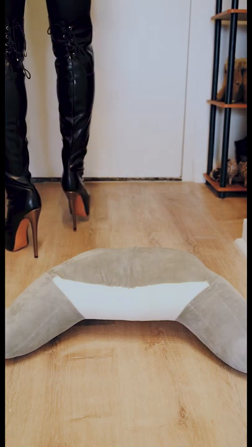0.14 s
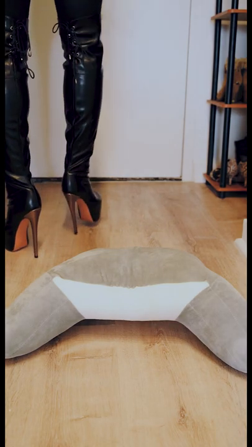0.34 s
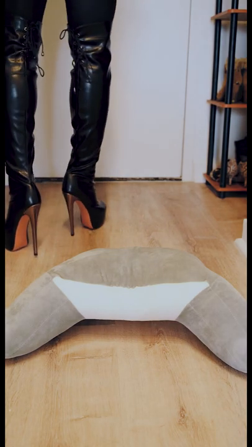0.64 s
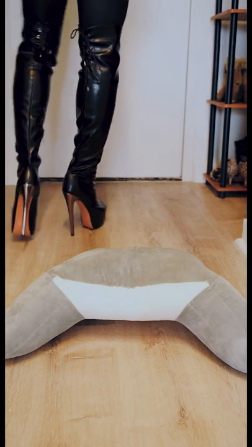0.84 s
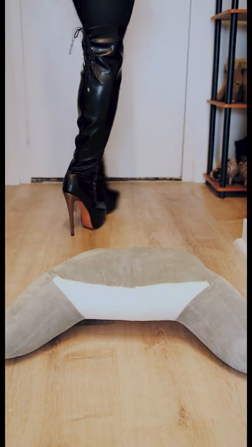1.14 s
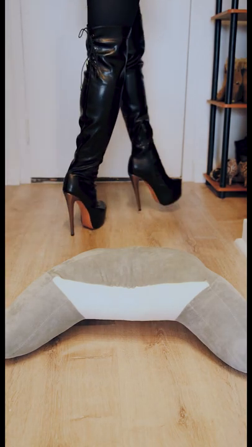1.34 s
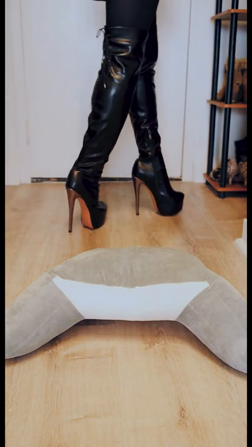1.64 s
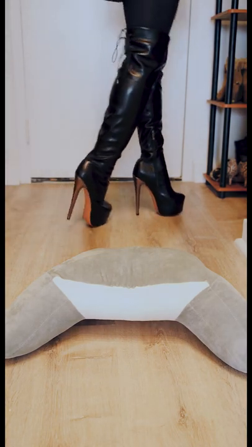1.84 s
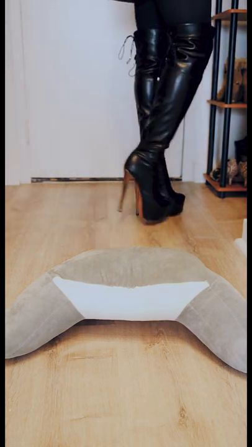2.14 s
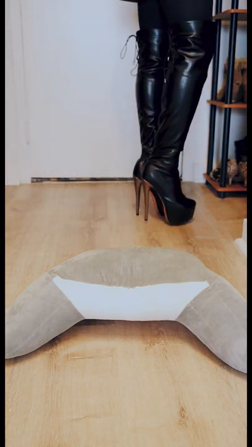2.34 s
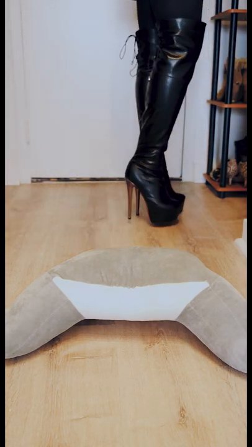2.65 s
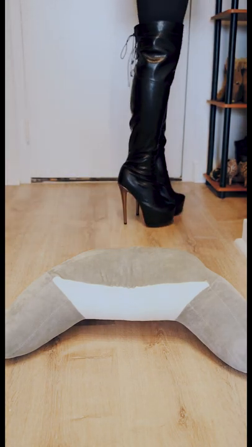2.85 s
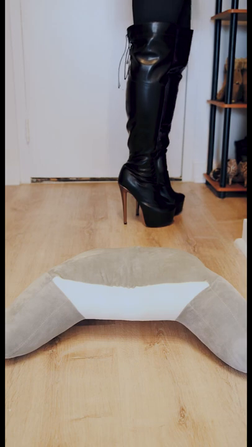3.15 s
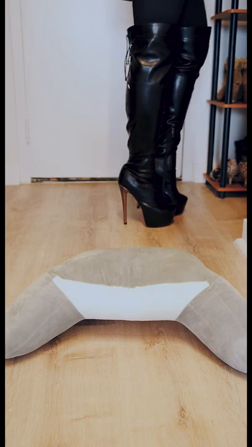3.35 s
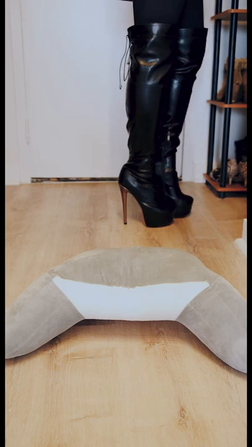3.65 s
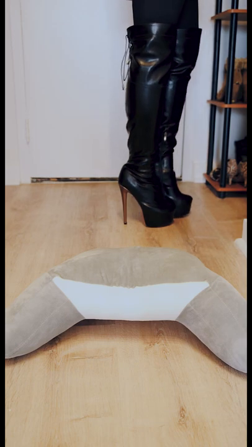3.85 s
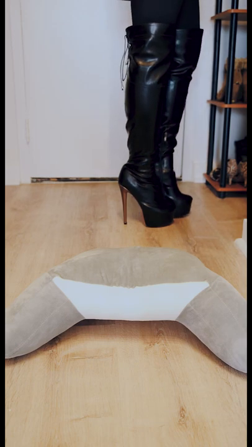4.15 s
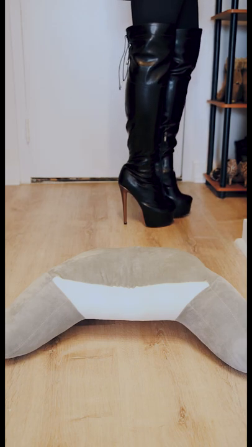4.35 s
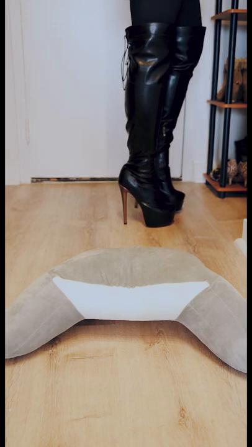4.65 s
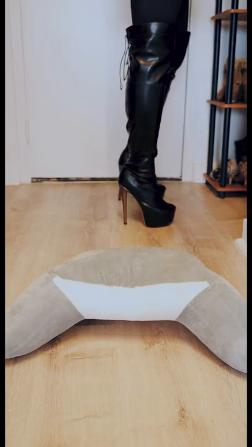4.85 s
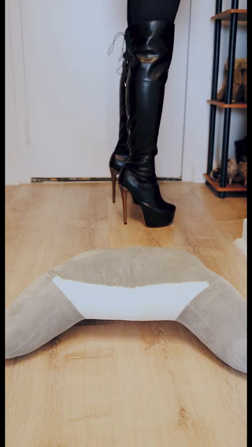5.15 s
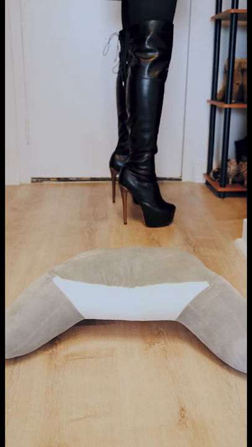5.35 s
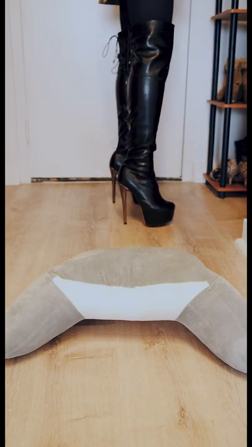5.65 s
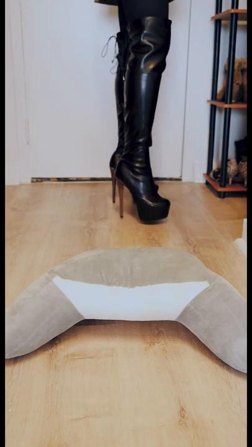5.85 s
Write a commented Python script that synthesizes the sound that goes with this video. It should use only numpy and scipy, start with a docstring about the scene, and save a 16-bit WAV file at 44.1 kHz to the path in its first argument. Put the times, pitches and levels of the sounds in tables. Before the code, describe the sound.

Stiletto boots take slow, uneven steps on a wooden floor in a small room, heard from nearby. Heel clicks and sole knocks mix with light taps and short gritty creaks as the soles twist. One heavier step near the middle makes the floor boom. The leather shafts rustle faintly and creak at the end. A low rumble and hum lie underneath, joined later by a faint, distant engine drone.

```python
"""Stiletto boots take slow, uneven steps on a wooden floor in a small room. Each impact of heel tip or platform
sole excites the modes of the boards; heavy ones make the floor boom. Soles and leather creak by stick-slip
friction as the weight shifts, shafts rustle and lace tips jingle. Underneath lie a low rumble, a faint hiss and
the steady hum of a far-off engine, which later speeds up through two gears."""
import sys
import numpy as np
from scipy import signal
from scipy.fft import rfft, irfft
from scipy.io import wavfile

SR = 44100
rng = np.random.default_rng(int(sys.argv[2]) if len(sys.argv) > 2 else 0)


def output_pcm(signal):
    """Save a mono or channel-first signal as 16-bit PCM at the path in sys.argv[1].

    Samples are clipped to [-1, 1] before scaling.
    """
    pcm = np.clip(np.atleast_2d(signal).T, -1, 1) * 32767
    wavfile.write(sys.argv[1], SR, np.round(pcm).astype(np.int16))


N = 264159
TIME = np.arange(N) / SR


def amp(db):
    """Amplitude ratio of a level in decibels."""
    return 10 ** (np.asarray(db) / 20)


def unit(x):
    """Normalisation to an rms of 1."""
    return x / np.sqrt(np.mean(x ** 2) + 1e-20)


def read(points, hz):
    """Interpolation of (Hz, value) rows on a logarithmic frequency axis."""
    f, value = np.transpose(points)
    return np.interp(np.log(hz + 1), np.log(f + 1), value)


def add(mix, s, sound):
    """Superposition of a sound on the mix, starting at s seconds."""
    part = mix[max(round(s * SR), 0):][:len(sound)]
    part += sound[:len(part)]


def noise(spectrum):
    """Spectral shaping of white noise, at rms 1."""
    gain = amp(read(spectrum, np.fft.rfftfreq(N, 1 / SR)))
    return unit(irfft(rfft(rng.standard_normal(N)) * gain, N))


def drift(rate_hz):
    """Slow random modulation: low-passed noise of rms 1."""
    hz = np.fft.rfftfreq(N, 1 / SR)
    return unit(irfft(rfft(rng.standard_normal(N)) * np.exp(-(hz / rate_hz) ** 2) * (hz > 0), N))


def pulse(*spectra, size=4096):
    """Minimum phase: the sharpest causal click that has the summed dB spectra."""
    hz = abs(np.fft.fftfreq(size, 1 / SR))
    log_gain = np.log(amp(sum(read(s, hz) for s in spectra)))
    return np.fft.ifft(np.exp(np.conj(signal.hilbert(log_gain)))).real[:size // 2]


def push(seconds):
    """Soft contact: a unit impulse spread over a rounded pulse."""
    shape = signal.windows.hann(round(seconds * SR))
    return shape / shape.sum()


def ring(hz, t60, t):
    """Free vibration of a damped mode, falling 60 dB in t60 seconds."""
    return np.sin(2 * np.pi * hz * t) * np.exp(-np.log(1000) * t / t60)


def tail(decays, rise_s, size=256):
    """Frequency-dependent damping: a noise burst of energy 1 that dies by (Hz, T60) rows."""
    t = np.arange(SR // 2) / SR
    hz, frame_s, bands = signal.stft(rng.choice([-1., 1.], len(t)), SR, nperseg=size)
    bands = np.exp(1j * np.angle(bands)) * amp(-60 * frame_s / read(decays, hz)[:, None])
    out = signal.istft(bands, SR, nperseg=size)[1][:len(t)] * (1 - np.exp(-t / rise_s))
    return out / np.linalg.norm(out)


# Spectra of the room's still air. Each row: frequency in Hz, relative density in dB.
RUMBLE_SPECTRUM = [(10, -6), (28, 1), (42, -5), (55, 1), (75, -8), (100, -6.5), (130, -6.5), (165, -8.5),
                   (205, -6), (250, -21.5), (300, -19.5), (370, -20.5), (450, -25.5), (700, -40),
                   (1500, -69), (4000, -93)]
HISS_SPECTRUM = [(150, -21), (500, 3), (1000, -0.5), (1500, -5.5), (2400, -11.5), (3500, -12),
                 (4800, -17.5), (8000, -19.5), (12000, -22), (16000, -24)]

def room_air():
    """Ambient noise: a low rumble swells and ebbs at random under a steady hiss."""
    rumble = noise(RUMBLE_SPECTRUM) * amp(-40 + 1.3 * drift(rate_hz=1.9))
    return rumble + amp(-61.5) * noise(HISS_SPECTRUM)


# Slow envelope of the hum. Each row: time in seconds, level in dB.
HUM_LEVELS = [(0,-40.5), (2.3,-44.5), (3.9,-41.5), (4.7,-55.5), (5.2,-47), (5.99,-49.5)]

def hum(pitch_hz=166.6, waver_hz=2.24, swell_db=3):
    """Frequency and amplitude modulation: one low tone wavers at random."""
    cycles = np.cumsum(pitch_hz + waver_hz * drift(rate_hz=8.7)) / SR
    tone = np.sin(2 * np.pi * cycles) * amp(swell_db * drift(rate_hz=4))
    return unit(tone) * amp(np.interp(TIME, *np.transpose(HUM_LEVELS)))


# Spectrum of the rustle. Each row: frequency in Hz, relative density in dB.
RUSTLE_SPECTRUM = [(200, -36), (600, 0), (1200, -4), (2200, -6.5), (3600, -6.5), (4600, -14), (8000, -17),
                   (12000, -27), (16000, -36)]
# Leg movements. Each row: middle in seconds, length in seconds, peak level in dB.
LEG_MOVES = [(.08,0.45,-58), (.52,0.46,-58), (1.04,0.56,-57.5), (2.02,0.49,-58.5), (2.9,1.9,-66.5),
             (4.98,0.34,-62), (5.65,0.59,-60.5)]

def shaft_rustle(edge_db=-6.5):
    """Friction noise: the boot shafts brush as the legs move, and overlapping moves add in power."""
    power = sum(amp(db + edge_db * (2 * (TIME - s) / length) ** 2) ** 2 for s, length, db in LEG_MOVES)
    return noise(RUSTLE_SPECTRUM) * np.sqrt(power)


# Early reflections. Each row: delay in seconds, relative gain.
REFLECTIONS = [(.0022, 0.67), (.0047, -0.29), (0.0087, 0.091), (0.0123, 0.48), (0.0161, -0.25)]
# Reverberation. Each row: frequency in Hz, T60 in seconds.
ROOM_DECAY = [(150, 0.21), (400, 0.34), (1000, 0.32), (2800, 0.3), (7000, 0.33), (14000, 0.065)]

def room(echo_db, wet_db):
    """Impulse response from one spot on the floor: direct sound, early reflections, diffuse tail."""
    path = amp(wet_db) * tail(ROOM_DECAY, rise_s=0.0016)
    path[0] += 1
    for delay, gain in REFLECTIONS:
        add(path, delay, np.array([gain * amp(echo_db)]))
    return path


# Spectrum of a blow on the boards. Each row: frequency in Hz, relative level in dB.
BLOW_SPECTRUM = [(40, -38.5), (120, 12.5), (350, 14), (600, 5), (900, -4.5), (1450, -3), (1800, -4),
                 (2400, -3.5), (3600, -1.5), (4400, -8.5), (6000, -3.5), (9000, -9.5), (11500, -22),
                 (16000, -35)]
# Centres of the thud, knock, clack and tick bands, in Hz.
BAND_CENTRES = [300, 1050, 2600, 6500]
# Modes of the boards. Each row: frequency in Hz, relative level in dB, T60 in seconds.
BOARD_MODES = [(181, -8, 0.29), (247.8, -0.5, 0.044), (397, 0, 0.102), (522, -8.5, 0.21),
               (579.4, -3.5, 0.2), (656, -6, 0.45), (731, 1.5, 0.13), (810, -4.5, 0.34), (872.4, 4.5, 0.14),
               (920, -12, 0.4), (989, -3, 0.23), (1146, -36, 0.17), (1210, -10, 0.2), (1275, -6, 0.092),
               (1260, -23, .12), (1516, 2, 0.11), (2200, -23, 0.079)]
FLOOR_LEAD_S = 0.0015  # sound travels faster through wood than through air

def footfall(knock_db, thud_db, clack_db, tick_db, spot_hz, spot_db):
    """Impact excitation: a blow rattles and rings the boards, coloured by the struck spot's resonance."""
    t = np.arange(SR // 2) / SR
    airborne = room(echo_db=-0.5, wet_db=0.5)
    # The tip seats itself with a second, stronger and rounder push.
    add(airborne, 0.0007, amp(3) * push(0.0004))
    rattle = amp(-2) * tail([(200, 0.028), (1500, 0.097), (8000, 0.036)], rise_s=0.0026)
    modes = amp(-43.5) * sum(amp(db) * ring(hz, t60, t) for hz, db, t60 in BOARD_MODES)
    path = np.zeros(len(t))
    add(path, 0, -amp(-6.5) * push(0.0011))  # the dull wave through the boards comes first
    add(path, FLOOR_LEAD_S, airborne + rattle + modes)
    hardness = list(zip(BAND_CENTRES, (thud_db, knock_db, clack_db, tick_db)))
    spot = [(spot_hz / 1.47, 0), (spot_hz, spot_db), (spot_hz * 1.36, 0)]
    return amp(24.5) * signal.fftconvolve(path, pulse(BLOW_SPECTRUM, hardness, spot))[:len(t)]


# Footfalls. Each row: start in seconds, relative knock, thud, clack and tick levels in dB,
# resonance of the spot in Hz, its height in dB.
FOOTFALLS = [(0.5035,-19.5,-37,-38.5,-68,270,11.5), (0.595,-32,-59,-38,-49,1950,9.5),
             (0.627,-34,-41,-46,-51,600,1.5), (0.8982,-49,-63,-49,-62,1200,10),
             (1.464,-29.5,-30.5,-37.5,-47.5,222,3.5), (1.562,-10.5,-25,-32,-44,416,6),
             (1.9493,-40,-62,-59,-66,980,1), (2.001,-45,-57,-50,-60,1220,12),
             (2.852,-5.5,-26,-21.5,-33.5,146,7.5), (3.22,-31.5,-40.5,-45.5,-72,557,2.5),
             (3.6843,-28,-51,-43,-48.5,3400,9.5), (3.753,-28,-32,-32.5,-45,990,8),
             (4.436,-39.5,-41.5,-38,-49,1013,17.5), (5.1471,-22,-37.5,-49,-49.5,1490,6)]

def steps():
    """Superposition of impacts, each on its own spot of the floor."""
    out = np.zeros(N)
    for s, *blow in FOOTFALLS:
        add(out, s - FLOOR_LEAD_S, footfall(*blow))
    return out


def creak(strokes, snaps, spectrum, swarm_db, snap_db, slips_per_s, spread_db, range_db=26):
    """Stick-slip friction: a swarm of tiny clicks follows the strain, with a few sharp ones added."""
    sizes = rng.choice([-1, 1], N) * amp(spread_db * np.minimum(rng.exponential(1, N), 3))
    swarm = unit((rng.random(N) < slips_per_s / SR) * sizes)
    # The strain rises by range_db over the build time and falls as far over the release.
    strain = sum(amp(db - range_db * np.maximum((s - TIME) / build, (TIME - s) / release))
                 for s, build, release, db in strokes)
    clicks = amp(swarm_db) * swarm * strain
    for s, db in snaps:
        snap = tail([(1000, 0.004), (10000, 0.0057)], rise_s=0.000077, size=32)
        add(clicks, s, amp(db + snap_db) * snap)
    response = signal.fftconvolve(room(echo_db=-6, wet_db=-2.5), pulse(spectrum))
    return signal.fftconvolve(clicks, response)[:N]


# Twists of a sole. Each row: peak time, build and release in seconds, relative level in dB.
SOLE_TWISTS = [(.715,0.068,0.047,-43), (1.768,0.028,0.069,-34.5), (3.322,0.18,0.089,-43.5),
               (4.53,0.026,0.04,-42), (4.566,0.021,0.025,-43)]
# Sharp clicks: slips of the sole and, near the end, a light heel clack.
# Each row: start in seconds, relative level in dB.
SHARP_CLICKS = [(0.5796,-47), (0.705,-39.5), (0.712,-34), (0.7285,-40.5), (0.7502,-38), (1.680,-44.5),
                (1.7215,-40.5), (1.7425,-37), (3.3072,-35.5), (3.337,-40.5), (4.521,-42), (5.624,-37)]
# Response of the sole. Each row: frequency in Hz, gain in dB.
SOLE_SPECTRUM = [(200, -0.5), (600, 8.5), (1000, 4.5), (1500, 7), (2400, 4), (3500, 4.5), (4500, -3.5),
                 (6500, -2), (8500, -4.5), (11500, -9.5), (16000, -18)]

def sole_creaks():
    """Torsional stick-slip: a sole grates on the floor as it twists under the body's weight."""
    return creak(SOLE_TWISTS, SHARP_CLICKS, SOLE_SPECTRUM,
                 swarm_db=-4, snap_db=20, slips_per_s=450, spread_db=4)


# Heavy landings. Each row: start in seconds, level in dB.
LANDINGS = [(1.4625,-36.5), (2.85,-27), (3.682,-33.5), (3.7522,-29), (4.435,-43)]

def floor_boom(mode_hz=73.3, t60_s=1, rise_s=0.012):
    """Resonance: the body's weight comes down and sets the whole floor swinging in one low mode."""
    t, out = np.arange(SR // 2) / SR, np.zeros(N)
    envelope = (1 - np.exp(-t / rise_s)) * (1 - (t / t[-1]) ** 2)
    boom = ring(mode_hz, t60_s, t) * envelope
    for s, db in LANDINGS:
        add(out, s, amp(db) * boom)
    return out


# Strikes of the lace tips. Each row: start in seconds, relative level in dB.
LACE_STRIKES = [(1.588,-53), (1.617,-56), (1.649,-59), (3.788,-55), (3.822,-64.5), (3.837,-66)]
# Modes of a tip. Each row: nominal frequency in Hz, relative level in dB, T60 in seconds.
LACE_MODES = [(9550,-4,.018), (9950,0,.025), (10250,-4,.02)]

def lace_jingles():
    """Modal ringing: metal lace tips tick against the boot after a firm step."""
    t, out = np.arange(SR // 10) / SR, np.zeros(N)
    for s, db in LACE_STRIKES:
        for hz, mode_db, t60 in LACE_MODES:
            add(out, s, amp(db + mode_db) * ring(hz * rng.uniform(0.93, 1.01), t60, t))
    return amp(-4.5) * signal.fftconvolve(out, room(echo_db=-27, wet_db=-2.5))[:N]


# Folds of a boot shaft. Each row: peak time, build and release in seconds, relative level in dB.
SHAFT_FOLDS = [(3.168,.02,0.12,-57), (5.531,.008,0.047,-52.5), (5.605,0.056,0.11,-50.5),
               (5.742,0.065,0.057,-54)]
# Sharp slips of the leather. Each row: start in seconds, relative level in dB.
SHAFT_SLIPS = [(5.575,-49), (5.702,-47), (5.743,-46)]
# Its response. Each row: frequency in Hz, gain in dB.
SHAFT_SPECTRUM = [(200, -3), (900, 4.5), (2400, 2), (3400, 8), (4500, -4.5), (6400, 1.5), (7400, -3),
                  (8400, -2), (11000, -15), (16000, -18)]

def shaft_creaks():
    """Stick-slip in bending: the leather shaft folds with a lighter, denser creak."""
    return creak(SHAFT_FOLDS, SHAFT_SLIPS, SHAFT_SPECTRUM,
                 swarm_db=3.5, snap_db=21, slips_per_s=730, spread_db=2)


# Engine orders. Each row: multiple of the firing rate, relative level in dB.
ENGINE_ORDERS = [(1,-19), (2,-9.5), (3,2), (3.5,-4), (5,-22), (6,-20)]
# Pulls in two gears. Each row: start and length in seconds, initial firing rate in Hz,
# its rise in Hz per second, peak level in dB.
ENGINE_PULLS = [(3.501,1.13,54.66,7.5,-38), (4.547,1.58,54.5,4,-47.5)]

def engine():
    """Periodic firing: a distant engine speeds up in each gear; only low orders pass the walls."""
    out = np.zeros(N)
    for start, length, start_hz, rise_hz_per_s, db in ENGINE_PULLS:
        t = np.clip(TIME - start, 0, length)
        firings = np.cumsum(start_hz + rise_hz_per_s * t + 0.5 * drift(rate_hz=8.8)) / SR
        drone = np.zeros(N)
        for order, order_db in ENGINE_ORDERS:
            gain = amp(order_db + 2.6 * drift(rate_hz=4.5))
            drone += gain * np.sin(2 * np.pi * (order * firings + rng.random()))
        out += amp(db) * np.sin(np.pi * t / length) * unit(drone)
    return out


def scene():
    """Superposition of the boots and the background in one channel."""
    boots = steps() + floor_boom() + sole_creaks() + shaft_creaks() + lace_jingles() + shaft_rustle()
    return (boots + engine() + room_air() + hum())[None]


def record(dry):
    """Band limiting: a linear-phase low-pass filter removes the highest treble."""
    lowpass = signal.firwin(511, cutoff=15900, window=("kaiser", 9), fs=SR)
    return signal.oaconvolve(dry, lowpass[None], "same")


dry = scene()
out = record(dry)
output_pcm(out)
```